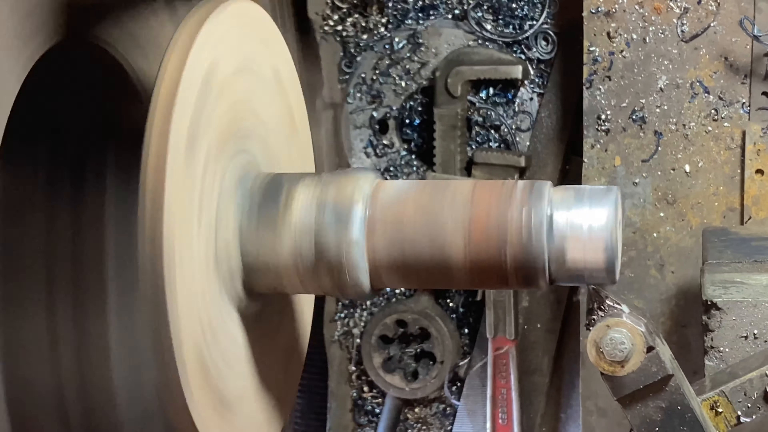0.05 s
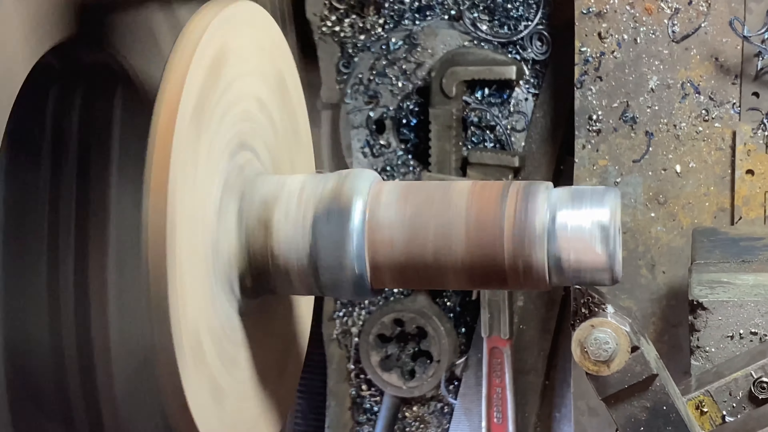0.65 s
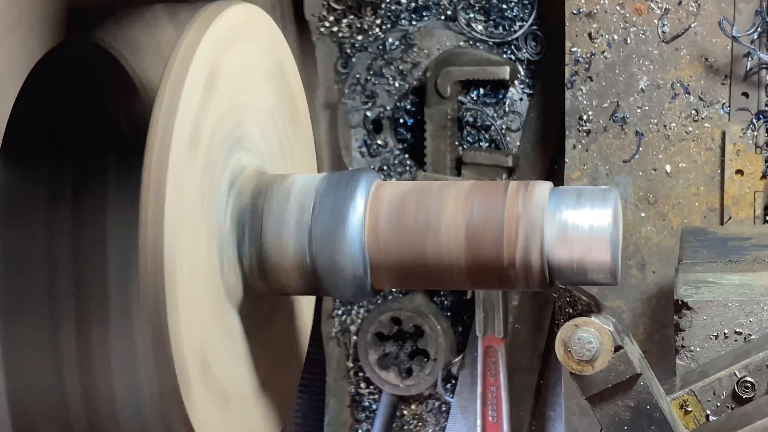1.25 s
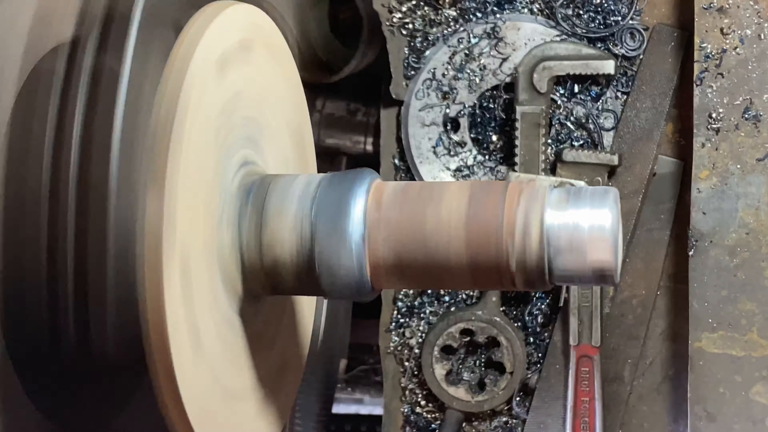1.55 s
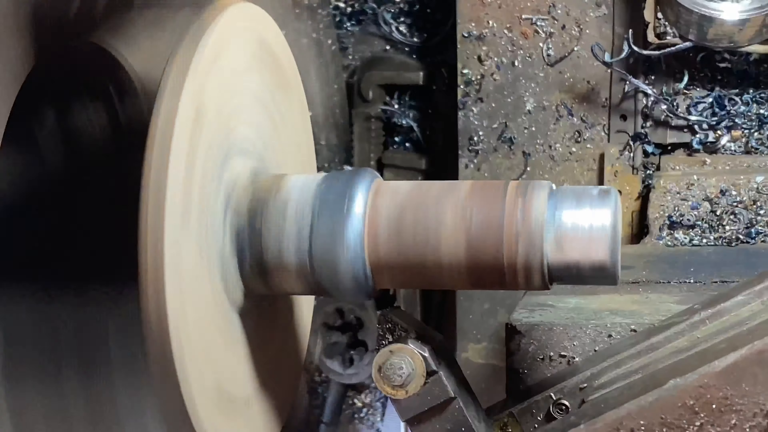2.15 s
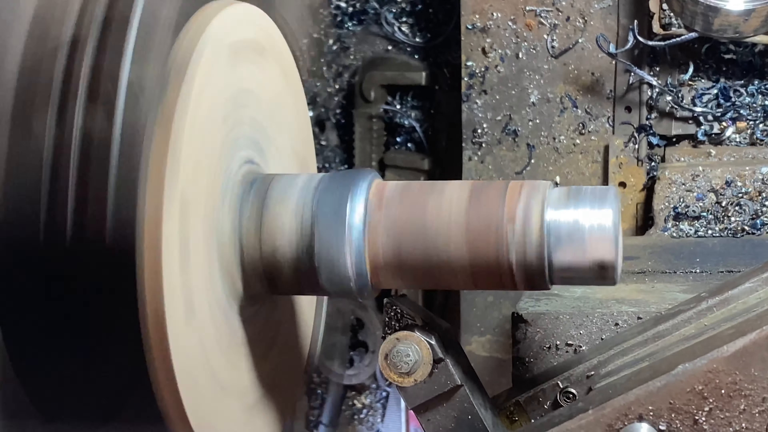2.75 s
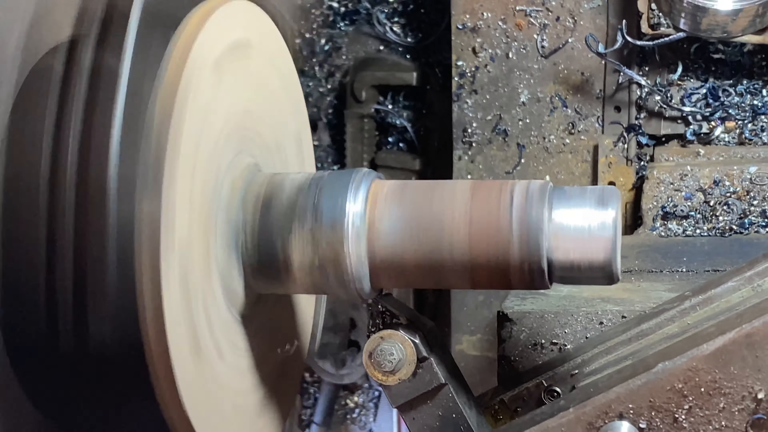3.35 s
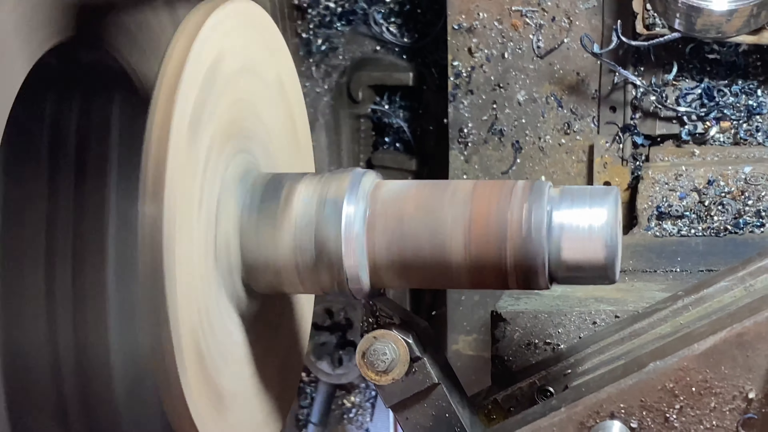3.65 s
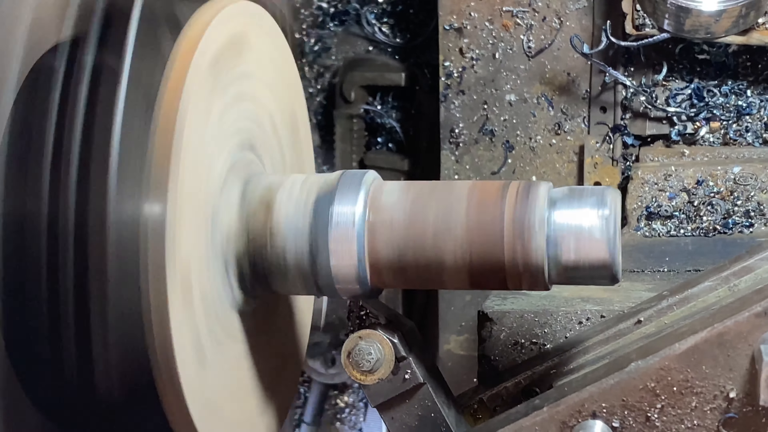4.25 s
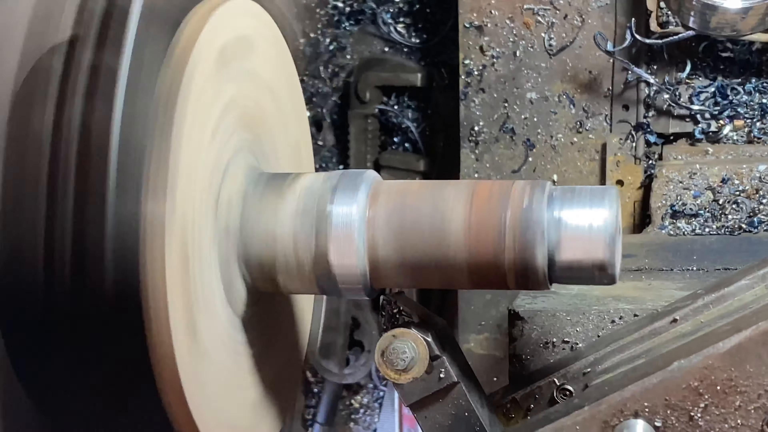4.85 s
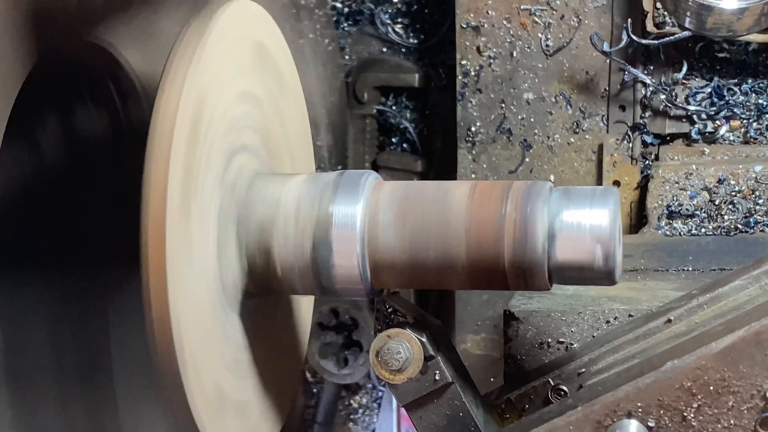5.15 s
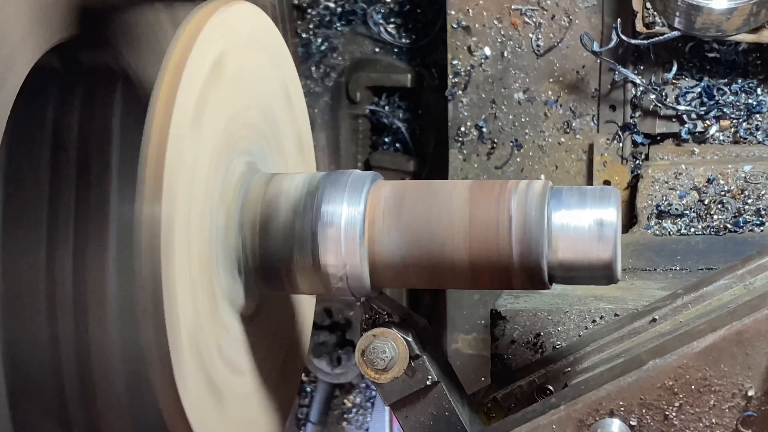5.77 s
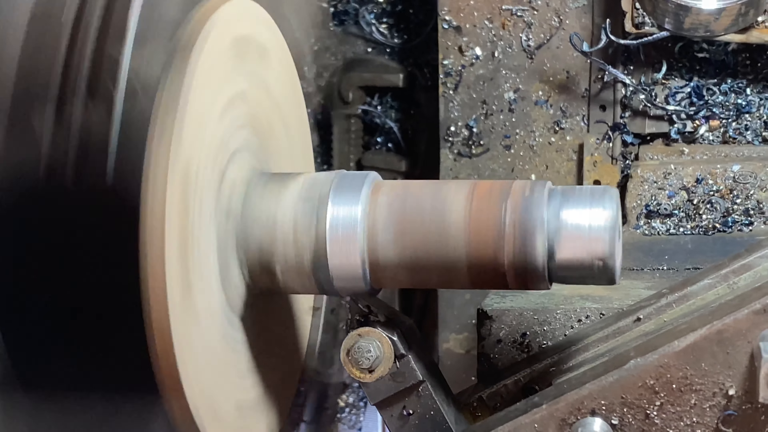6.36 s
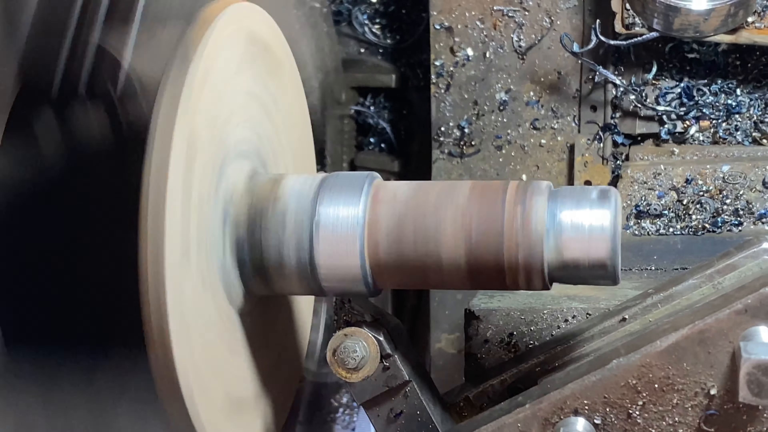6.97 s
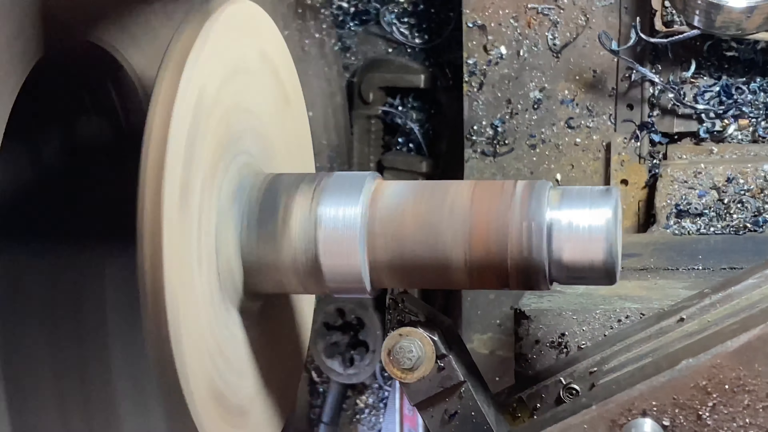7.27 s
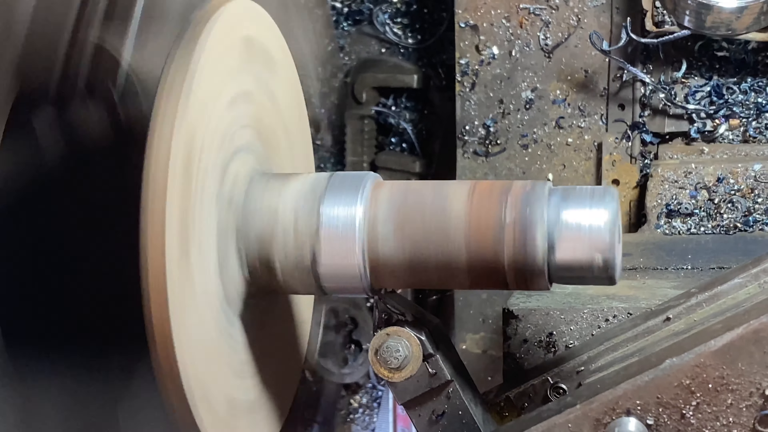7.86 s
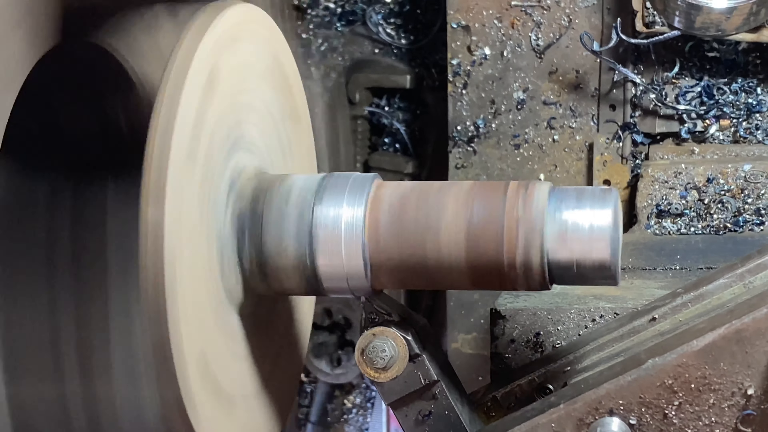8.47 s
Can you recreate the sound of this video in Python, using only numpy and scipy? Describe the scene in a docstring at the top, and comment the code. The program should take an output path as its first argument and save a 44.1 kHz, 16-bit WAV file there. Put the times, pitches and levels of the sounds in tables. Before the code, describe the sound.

Heard close up in stereo, a workshop lathe starts with a piercing squeal as its tool bites a turning steel shaft. After a second the squeal gives way to on-and-off scraping and high chatter, with small chip ticks and thin squeaks. Gear whine and a fine metallic rattle run underneath throughout, shifting abruptly in loudness and broken by three short gaps.

```python
"""A metal lathe cutting steel

Close by, the gears whine and growl, and tiny knocks rattle the headstock (the gear housing).
The tool scrapes chips off a turning shaft and chatters (shakes against the steel), squealing
near 8 kHz for the first second. Chips squeak and tick, and something groans briefly.
The sound jumps in level a few times and drops out three times."""
import sys
import numpy as np
from scipy.fft import rfft, irfft, next_fast_len
from scipy.io import wavfile
from scipy.ndimage import uniform_filter1d, map_coordinates

SR = 44100
rng = np.random.default_rng(int(sys.argv[2]) if len(sys.argv) > 2 else 0)


def store_pcm(level_fs):
    """Save levels as 16-bit WAV."""
    pcm = np.round(np.clip(level_fs, -1, 1) * 32767).astype(np.int16)
    wavfile.write(sys.argv[1], SR, np.atleast_2d(pcm).T)


N = 384111

MOTOR_HZ = 49.55  # turns per second
# ringing of the headstock and its metal guards: pitch_hz, width_hz, level_db
GUARD_RINGS = [(1332, 120, -1.5), (1467, 110, -1), (1652, 110, 2), (1818, 58, -1), (2016, 130, 0.5),
               (2207, 240, -2), (2433, 220, -0.5), (2838, 100, 3), (3180, 530, -3), (3875, 520, 1),
               (4435, 850, -0.5), (5200, 1100, -5), (5990, 340, -3.5), (6340, 310, -2), (6680, 170, -1.5),
               (7610, 540, -3), (11400, 700, -10.5)]
# passes of the tool through the steel: start_s, end_s, scrape_db, tip_ring_db
TOOL_PASSES = [(-.1, 1.076, -44, -32), (3.14, 4.48, -42.3, -43.5), (5.062, 6.42, -38.5, -39.5),
               (6.597, 6.95, -46, -53), (7.676, 8.8, -39, -46.5)]


def cutting(tip_hz=8205, tip_width_hz=75, settle_db_per_s=7):
    """The chip tears off in tiny slips that ring the tool's holder and tip, throbbing with the motor."""
    # ringing of the tool, its holder and the slide: pitch_hz, width_hz, level_db
    holder_rings = [(630, 11, 1.5), (2963, 55, 3.5), (3096, 77, 2), (4400, 66, 2.5), (4483, 74, 5),
                    (4510, 40, 0.5), (9980, 630, -13.5)]
    # the tip flares into chatter: middle_s, length_s, level_db
    flares = [(1.22, .25, -46), (1.42, .13, -34.5), (2.47, 0.079, -38), (6.28, .12, -47), (7.85, 0.21, -43),
              (8.5, .5, -46)]
    scrape, ring = np.zeros(N), np.zeros(N)
    for depth, (start, _, scrape_db, tip_db) in zip(cut_depths(), TOOL_PASSES):
        scrape += depth * amp(scrape_db)
        ring += depth * amp(tip_db - settle_db_per_s * (clock() - start))
    ring = np.hypot(ring, swells(flares))
    slips = amp(2.5 * wobble(300) + 2 * np.sin(2 * np.pi * MOTOR_HZ * clock()))
    holder = amp(1.2) * scrape * noise(resonances(holder_rings), slips)
    tip = amp(4.5) * ring * noise(resonances([(tip_hz, tip_width_hz, 0)]), slips)
    fuzz = amp(-7.5) * ring * noise(resonances([(8230, 470, 0)]), slips)
    return holder + fuzz + (1 - squealing()) * tip  # the loose ringing gives way to the squeal


def squeal(pitch_hz=8136, rise_hz_per_s=15, level_db=-30, sway=0.45, throb=0.21, rough=0.18):
    """The tip keeps itself shaking; the motor's uneven pull sways the pitch twice a turn."""
    motor = 2 * np.pi * MOTOR_HZ * clock()
    phase = turning(pitch_hz + rise_hz_per_s * clock()) + sway * np.sin(2 * motor) + rough * wobble(320)
    strength = 1 + throb * np.sin(motor) - 0.1 * np.cos(2 * motor) + rough * wobble(250)
    sides = np.array([[.5], [-.5]])  # the tone reaches the left earlier and the right louder
    return squealing() * amp(level_db - 2 * sides) * unit(strength * np.sin(phase + 0.72 * sides))


def headstock(rattle_db, drone_db):
    """Gear teeth and bearings knock, bunched by the motor's turns, and ring the guards and the bed."""
    # tone colour of the rattle: pitch_hz, level_db
    rattle_colour = [(330, -51), (430, -8.5), (900, -10.5), (1170, -8.5), (1400, -5), (2200, -5),
                     (3400, -2), (4300, -1.5), (6300, -3), (7000, -5), (8800, -7.5), (11500, -9.5),
                     (12800, -13), (15700, -11.5)]
    # ringing of the bed, the lathe's cast base: pitch_hz, width_hz, level_db
    bed_rings = [(466, 74, -8.5), (634, 35, 0), (709, 61, -9), (780, 63, -10), (846, 42, -0.5),
                 (890, 21, 3), (950, 54, -3), (1030, 130, -6.5)]
    # tone colour of the low rumble: pitch_hz, level_db
    rumble_colour = [(25, -3), (120, -3.5), (230, 0), (350, 4.5), (500, -15.5)]
    knocks = amp(1.2 * wobble(600) + 0.95 * wobble(60) + 0.47 * np.sin(2 * np.pi * MOTOR_HZ * clock()))
    ripple = lambda f: metal_ripple(f, spacing_hz=14, depth_db=2.8)
    hiss = amp(rattle_db - 2.5) * noise(lambda f: amp(along(rattle_colour, f)) * ripple(f), knocks)
    guards = amp(rattle_db - 3.5) * noise(lambda f: resonances(GUARD_RINGS)(f) * ripple(f), knocks)
    bed = amp(drone_db - 0.5) * noise(resonances(bed_rings), knocks)
    rumble = amp(rattle_db - 44) * noise(lambda f: amp(along(rumble_colour, f)))
    return hiss + guards + bed + rumble


def gears(fast_db, slow_db, rattle_db):
    """Two gear pairs and the bearings sing; the belt lets the slow shaft's speed wander."""
    # tones of the fast gear pair: pitch_hz, level_db
    fast_tones = [(988, -15), (1000, 1.5), (1012.4, -30.5), (2000.5, -7.5), (3000, -19)]
    # tones of the slow pair, spaced by its shaft's turning rate: pitch_hz, level_db
    slow_tones = [(420, -25), (444.7, -5.5), (468, 3.5), (492.5, -4), (541.5, -15.5)]
    # tones of the bearings: pitch_hz, level_db
    bearing_tones = [(630, -7), (642, -2), (694, -8), (792, -6.5), (843, -2), (926, -1), (1480, -5.5),
                     (1830, -6), (2697, -5.5), (2966, 0.5), (3832, -4), (3957, 0.5), (4026, -5)]
    whine = tones(fast_tones, 1 + 0.0006 * wobble(6), smear=.15, flutter_db=0.5)
    growl = tones(slow_tones, 1 + 0.00307 * wobble(5), smear=0.43, flutter_db=0)
    bearings = tones(bearing_tones, 1 + 0.001005 * wobble(5), smear=.7, flutter_db=4.5)
    return amp(fast_db + 1.8) * whine + amp(slow_db - 1.43) * growl + amp(rattle_db - 14) * bearings


def chips(fade_s=0.042, crack_db=-5, attack_s=0.00054):
    """Curls of steel snap off with a bright crack and tick against the guards."""
    # chips striking the machine: start_s, level_db
    strikes = [(1.958, -21), (2.0, -23), (2.394, -11), (2.44, -22.5), (3.247, -30), (5.257, -15.5),
               (5.581, -24), (8.052, -28)]
    blows = np.zeros(N)
    for start, db in strikes:
        age = np.maximum(clock() - start, 0)
        blows += amp(db - 9 - 60 * age / fade_s) * (1 - np.exp(-age / attack_s))
    tick = noise(resonances(GUARD_RINGS))
    crack = amp(crack_db) * noise(resonances([(5000, 14000, 0)]))
    return blows * (tick + crack)


def squeaks(rough=0.64):
    """A chip drags on the tool and sings for a moment, swelling fast and fading."""
    # thin metallic squeaks: start_s, length_s, start_hz, end_hz, level_db
    drags = [(0.01, .35, 4550, 4520, -46), (0.356, 0.027, 4210, 4620, -37),
             (0.36, 0.023, 2250, 2640, -40.5), (0.968, .045, 4500, 4510, -42.5),
             (1.705, 0.27, 3680, 3670, -45.5), (1.718, 0.41, 6530, 6380, -49.5),
             (1.796, 0.14, 6200, 6050, -49.5), (1.985, .03, 7010, 6980, -39.5),
             (1.986, 0.026, 11660, 11500, -44), (2.032, .16, 2040, 2090, -44),
             (5.274, .017, 4370, 4620, -32), (6.43, 0.014, 4520, 4580, -36)]
    out = np.zeros(N)
    for start, length, start_hz, end_hz, db in drags:
        progress = np.clip((clock() - start) / length, 0, 1)
        phase = turning(start_hz + (end_hz - start_hz) * progress) + rough * wobble(150)
        out += amp(db + 6.5) * np.sin(np.pi * np.sqrt(progress)) * np.sin(phase)
    return out


def groans():
    """Something rubs briefly with a falling pitch."""
    # short rubs: start_s, length_s, start_hz, end_hz, lowest_tone_db, overtones_db
    rubs = [(2.44, 0.068, 1007, 800, -39, -52), (4.248, 0.153, 565, 459, -42.5, -62),
            (8.325, 0.202, 420, 396, -60, -46)]
    out = np.zeros(N)
    for start, length, start_hz, end_hz, lowest_db, overtones_db in rubs:
        progress = np.clip((clock() - start) / length, 0, 1)
        phase = turning(start_hz + (end_hz - start_hz) * progress) + .2 * wobble(60)
        overtones = amp(overtones_db) * (np.sin(2 * phase) + np.sin(3 * phase))
        out += np.sin(np.pi * progress) * (amp(lowest_db) * np.sin(phase) + overtones)
    return out


def idle_rasp(grit_db=6.5):
    """While the tool is clear of the steel, a gritty rasp near 4 kHz stands out."""
    clear = np.clip(1 - sum(cut_depths()), 0, 1)
    return clear * noise(resonances([(3920, 290, 0)]), amp(grit_db * wobble(250)))


def bumps(width_s=0.00046):
    """Small, dull bumps where the level jumps."""
    # soft single pushes: middle_s, level_db
    pushes = [(2.237, -47), (3.044, -50), (4.781, -51), (4.825, -51.5), (6.535, -56), (6.597, -47),
              (7.234, -44)]
    return sum(amp(db) * np.exp(-np.minimum(((clock() - s) / width_s) ** 2, 20)) for s, db in pushes)


def cut_depths(feed_in_s=.13, run_out_s=.14):
    """How deep the tool is in the steel, 0 to 1, for each pass."""
    return [held(start, end, feed_in_s, run_out_s) for start, end, _, _ in TOOL_PASSES]


def squealing():
    """One while the chatter is locked into a squeal, fading to zero after it."""
    return held(start=-.05, end=1.06, rise_s=0.056, fade_s=0.056)


def machine_levels(usual_rattle_db=-33.5, bed_db=-46, growl_db=-46, wander_db=1.7):
    """Levels in dB of the rattle, the bed and both gear pairs, which rise and sink together."""
    # the rattle, which the gears and the bed follow: time_s, level_db
    rattle_levels = [(0, -35), (.35, -34.3), (.6, -36), (1.1, -37), (1.25, -34.5), (1.944, -36.5),
                     (1.95, -30.5), (2.42, -30), (2.62, -32), (4.82, -34), (5.15, -30.2), (6.08, -31),
                     (6.18, -33), (6.48, -33.5), (6.63, -36), (7.225, -38.5), (7.242, -32), (8.7, -32)]
    # the gear whine, relative to the rattle: time_s, level_db
    whine_levels = [(0, -8), (1.8, -6.5), (2.4, -10), (3.0, -8), (3.4, -13.5), (4.4, -11), (4.8, -8.5),
                    (5.15, -10.5), (6.85, -12.5), (7.2, -8), (7.9, -11.5), (8.7, -11)]
    # the level sinks and recovers: time_s, change_db
    sags = [(3.051, -7.5), (7.635, -4)]
    # the tool bites harder and the bed drones: middle_s, length_s, level_db
    bites = [(.65, 0.83, -45.5), (1.2, .12, -40.5), (1.4, .18, -40.5), (2.485, .16, -33),
             (3.25, 0.3, -38.5), (4.25, 0.72, -42.5), (5.2, .22, -35.5), (6.78, 0.32, -46.5),
             (7.79, 0.14, -39)]
    rattle_db, whine_db = curve(rattle_levels), curve(whine_levels)
    sag_db = sum(db * held(s - .01, s + .04, rise_s=.01, fade_s=.12) for s, db in sags)
    excess_db = rattle_db - usual_rattle_db
    drone_db = 20 * np.log10(np.hypot(amp(bed_db + 0.51 * excess_db), swells(bites)))
    slow_db = growl_db + 0.86 * excess_db + wander_db * wobble(6)
    return sag_db + np.array([rattle_db, drone_db, rattle_db + whine_db, slow_db])


def left_and_right(hz, ripple_db=1):
    """Each side has its own tone colour and timing, and its own fine ripple in the treble."""
    # how much louder the left side is: pitch_hz, left_minus_right_db
    balance = [(500, -.5), (1500, 0), (3000, 0.4), (5500, -2), (9000, 0), (14000, -2.5)]
    # how far the left side's wave runs ahead: pitch_hz, lead_radians
    left_lead = [(100, -0.15), (6000, -0.21), (8000, -0.078), (12000, .3)]
    sides = np.array([[.5], [-.5]])
    ripples = np.array([metal_ripple(hz, 171.1, ripple_db * np.minimum(hz / 5000, 1)) for _ in sides])
    return ripples * amp(sides * along(balance, hz)) * np.exp(1j * sides * along(left_lead, hz))


def tones(rows, speed, smear, flutter_db):
    """Tones that follow one shaft's speed, each a little unsteady in level and pitch."""
    shaft = turning(speed)
    out = np.zeros(N)
    for hz, db in rows:
        strength = amp(db + flutter_db * wobble(9))
        out += strength * np.sin(hz * shaft + smear * wobble(14) + rng.uniform(0, 2 * np.pi))
    return unit(out)


def noise(response, drive=1):
    """Stereo noise of average power 1, pulsed by a drive and coloured by a response."""
    # how alike the two sides are: pitch_hz, likeness (1 = the same)
    likeness = [(100, .35), (300, 0.86), (430, 1), (900, 0.94), (1400, 0.96), (2700, 1), (3600, 0.9),
                (3960, 0.74), (4450, 1), (5200, 0.84), (7100, 0.52), (7700, 0.66), (9000, 0.56),
                (14000, .33)]

    def split(hz):
        angle = np.arccos(np.clip(along(likeness, hz), -1, 1)) / 2
        return response(hz) * np.array([np.cos(angle), np.sin(angle)])

    mid, side = filtered(drive * rng.standard_normal((2, N)), split)
    return unit(np.array([mid + side, mid - side]))


def resonances(rings, bass_cut_hz=400):
    """Response of a body that rings at (pitch_hz, width_hz, level_db) rows and gives off no bass."""
    power = lambda f: sum(amp(db) ** 2 / (1 + (2 * (f - hz) / width) ** 2) ** 2
                          for hz, width, db in rings)
    return lambda f: np.sqrt(power(f) / (1 + (bass_cut_hz / (f + 1)) ** 30))


def metal_ripple(hz, spacing_hz, depth_db):
    """Random peaks and dips from the many close ringing pitches of a big metal body."""
    knots = np.arange(0, SR / 2, spacing_hz)
    return amp(depth_db * np.interp(hz, knots, rng.standard_normal(len(knots))))


def filtered(x, response):
    """Scale and shift each frequency of x as the response says."""
    size = next_fast_len(N + SR // 4)
    return irfft(rfft(x, size) * response(np.fft.rfftfreq(size, 1 / SR)), size)[..., :N]


def wobble(rate):
    """A smooth curve through `rate` random values a second."""
    knots = rng.standard_normal(int(N * rate / SR) + 4)
    coarse = clock()[::32]
    return np.interp(clock(), coarse, map_coordinates(knots, [coarse * rate]))


def held(start, end, rise_s, fade_s):
    """Rises from the start, holds at one until the end, then fades to nothing."""
    return np.clip((clock() - start) / rise_s, 0, 1) * np.clip(1 - (clock() - end) / fade_s, 0, 1)


def swells(rows):
    """Gain that rises and falls in one arch for each (middle_s, length_s, level_db) row."""
    return sum(amp(db) * np.cos(np.pi * np.clip((clock() - middle) / length, -.5, .5))
               for middle, length, db in rows)


def curve(points):
    """Join (time_s, value) points with straight lines."""
    return np.interp(clock(), *np.transpose(points))


def along(points, hz):
    """Read between (pitch_hz, value) points, with octaves evenly spaced."""
    pitches, values = np.transpose(points)
    return np.interp(np.log(hz + 1), np.log(pitches + 1), values)


def turning(hz):
    """The angle reached by something that turns at a varying rate."""
    return 2 * np.pi * np.cumsum(hz) / SR


def amp(db):
    """Decibels to gain."""
    return 10 ** (np.asarray(db) / 20)


def unit(x):
    """Scale to an average power of 1."""
    return x / np.sqrt(np.mean(x ** 2) + 1e-20)


def clock():
    """The time of every sample, in seconds."""
    return np.arange(N) / SR


def scene():
    """The running lathe and its cut, heard close by in stereo."""
    rattle_db, drone_db, fast_db, slow_db = machine_levels()
    machine = gears(fast_db, slow_db, rattle_db) + headstock(rattle_db, drone_db)
    machine += amp(rattle_db - 12.5) * idle_rasp() + groans()
    tool = cutting() + squeal() + squeaks() + chips()
    return filtered(machine + tool, left_and_right)


def record(dry, tail_s=0.042, top_hz=15800):
    """The sound drops out with a faint short tail, stutters once, bumps and loses its highest treble."""
    # the sound falls silent: start_s, end_s
    dropouts = [(2.237, 2.3137), (4.8266, 5.0985), (7.516, 7.6034)]
    # the level dips briefly: start_s, end_s, change_db
    dips = [(6.483, 6.513, -11.5), (6.537, 6.567, -7.5), (6.597, 6.623, -11.5)]
    t, gain = clock(), np.ones(N)
    for start, end in dropouts:
        inside = (t >= start) & (t < end)
        gain[inside] = amp(-21.5 - 60 * (t[inside] - start) / tail_s)
    for start, end, db in dips:
        inside = (t >= start) & (t < end)
        progress = (t[inside] - start) / (end - start)
        gain[inside] = amp(db * (1 - progress ** 4))  # falls at once, swells back
    gain = uniform_filter1d(gain, size=50)  # soften the edges
    return filtered(dry * gain + bumps(), lambda f: np.clip((top_hz - f) / 100 + .5, 0, 1))


dry = scene()
out = record(dry)
store_pcm(out)
```